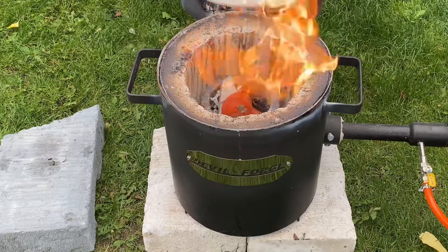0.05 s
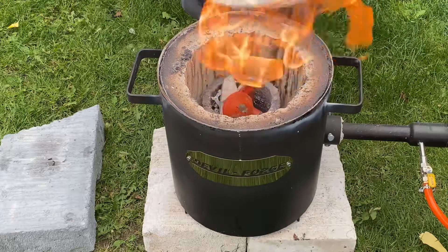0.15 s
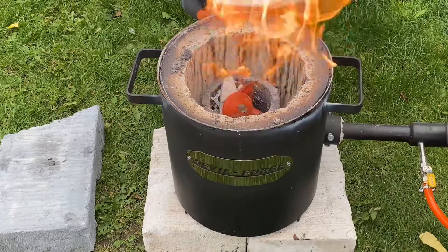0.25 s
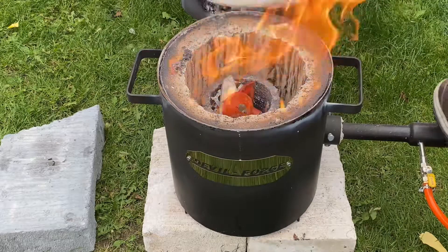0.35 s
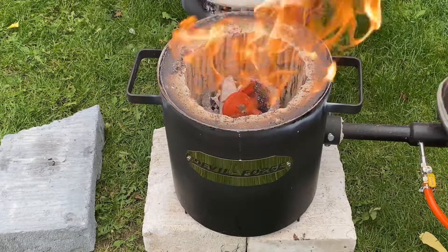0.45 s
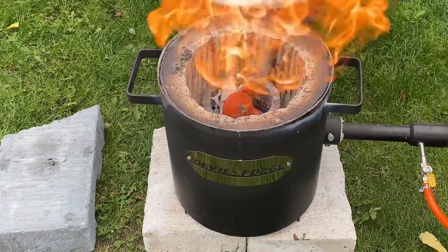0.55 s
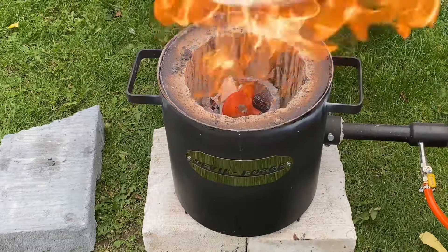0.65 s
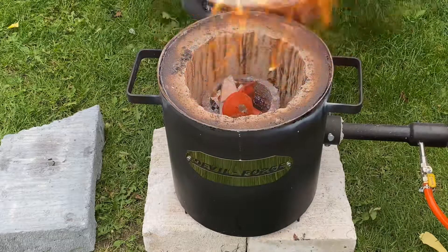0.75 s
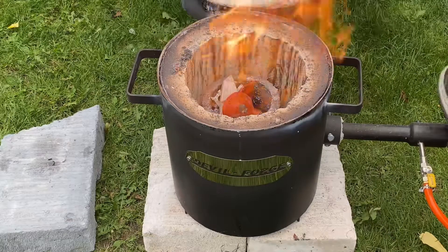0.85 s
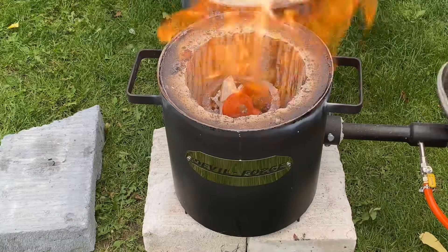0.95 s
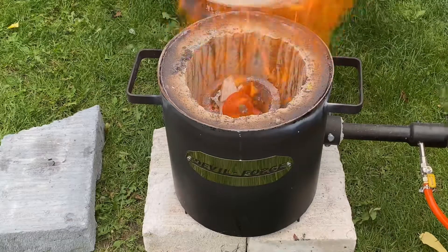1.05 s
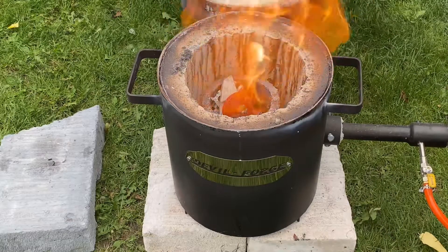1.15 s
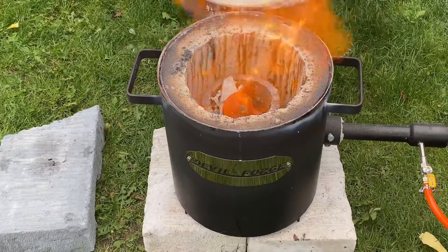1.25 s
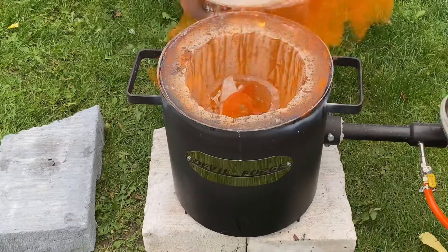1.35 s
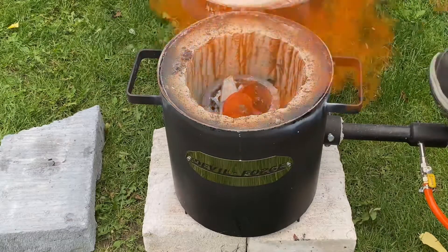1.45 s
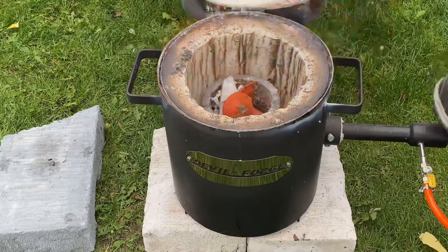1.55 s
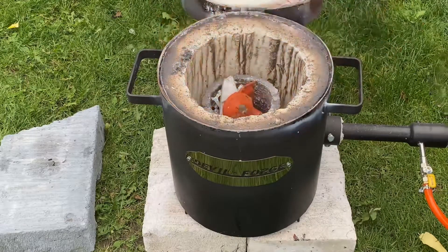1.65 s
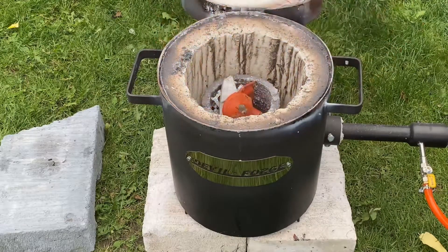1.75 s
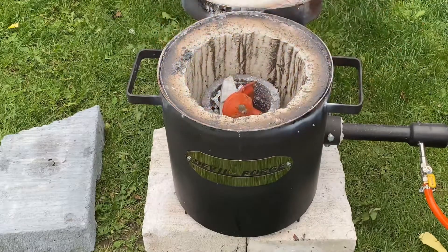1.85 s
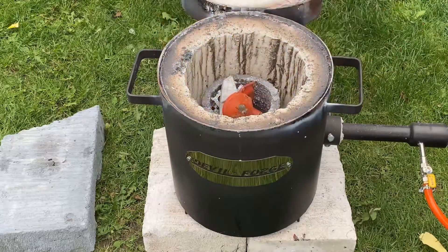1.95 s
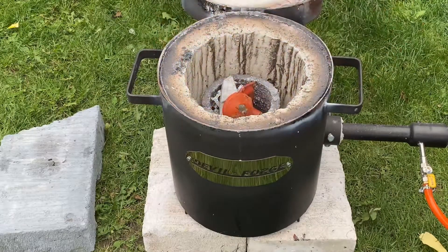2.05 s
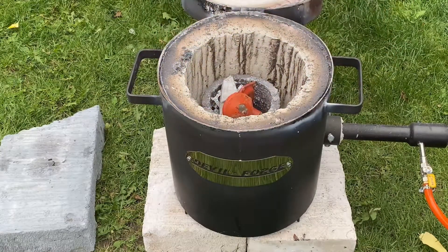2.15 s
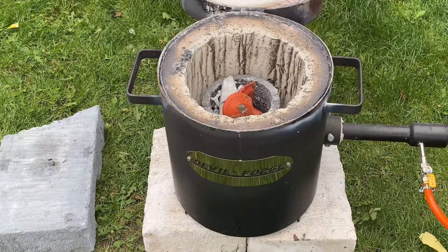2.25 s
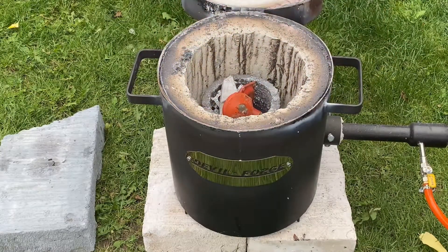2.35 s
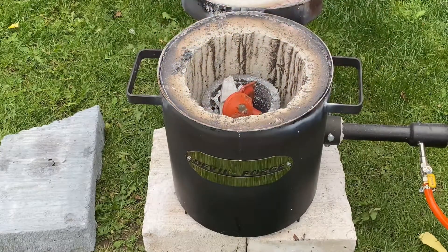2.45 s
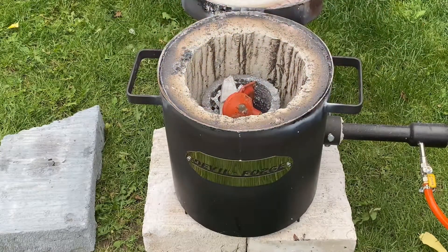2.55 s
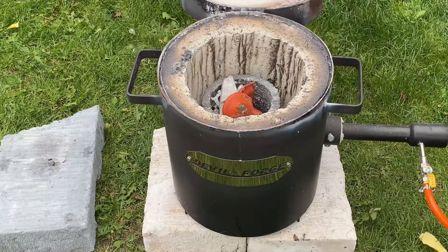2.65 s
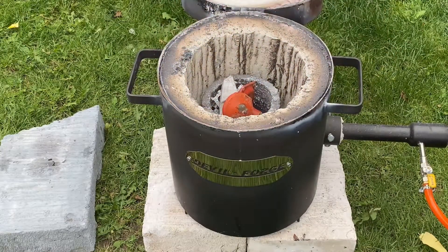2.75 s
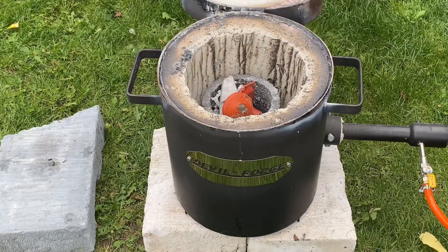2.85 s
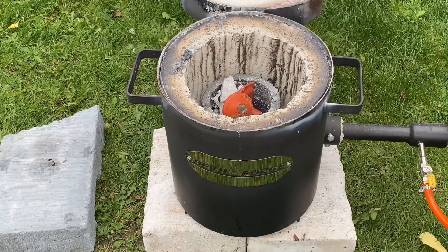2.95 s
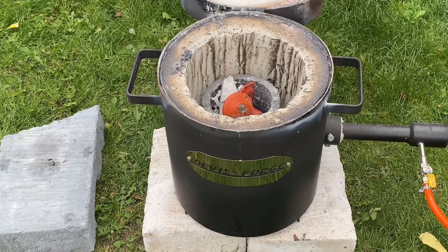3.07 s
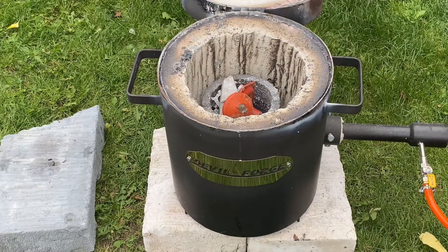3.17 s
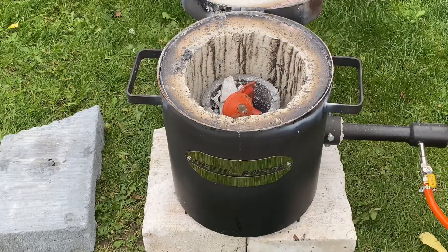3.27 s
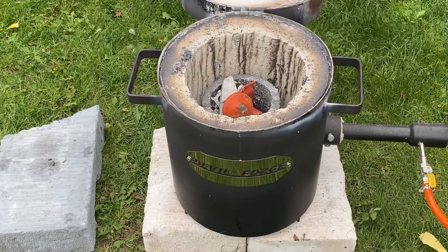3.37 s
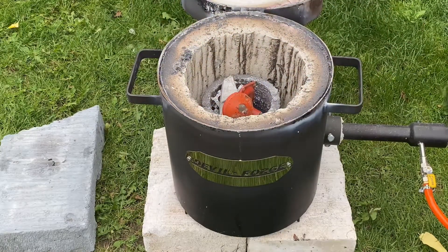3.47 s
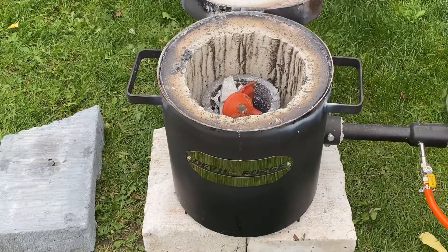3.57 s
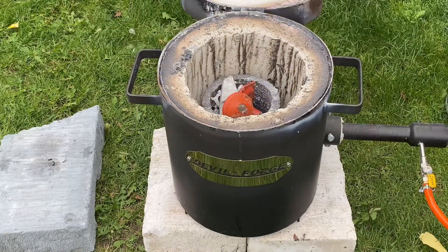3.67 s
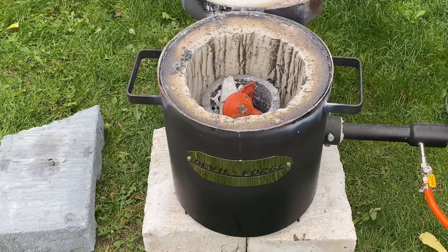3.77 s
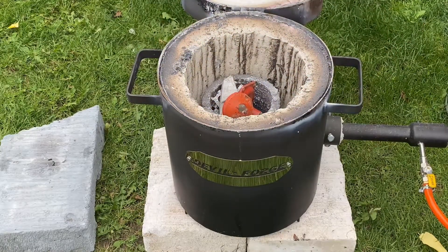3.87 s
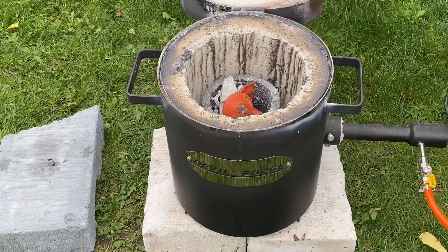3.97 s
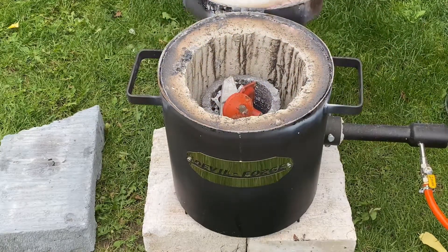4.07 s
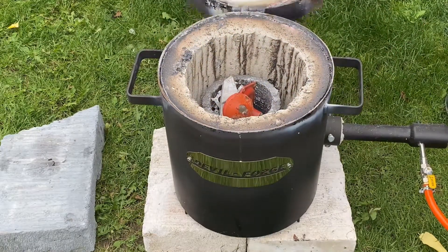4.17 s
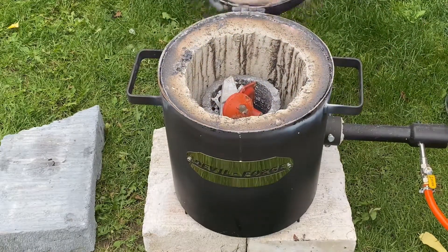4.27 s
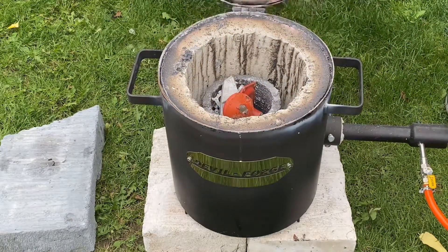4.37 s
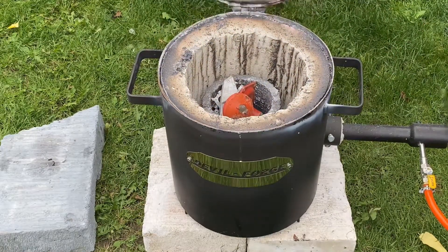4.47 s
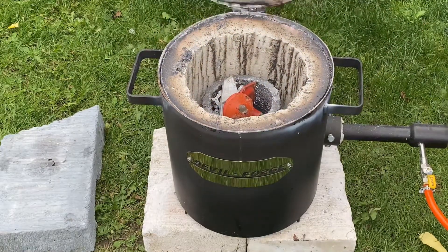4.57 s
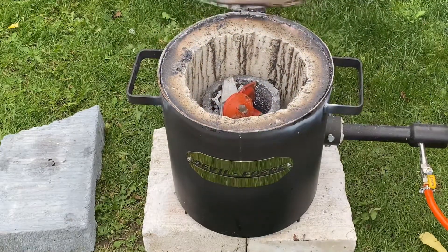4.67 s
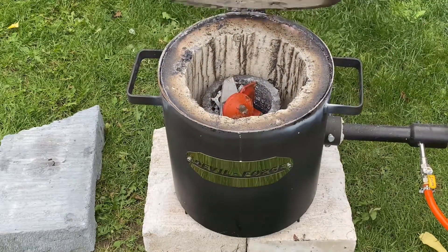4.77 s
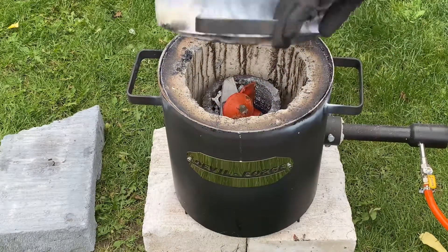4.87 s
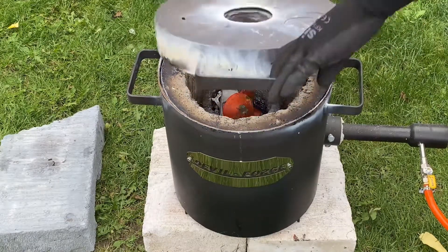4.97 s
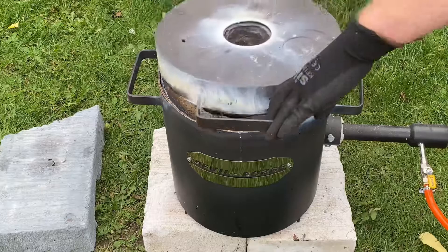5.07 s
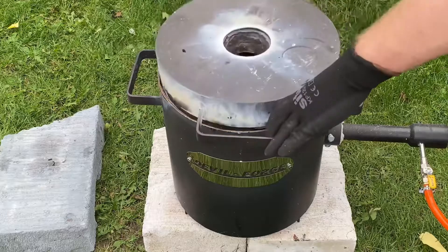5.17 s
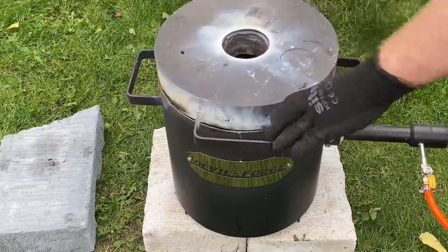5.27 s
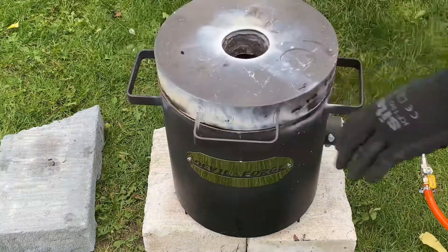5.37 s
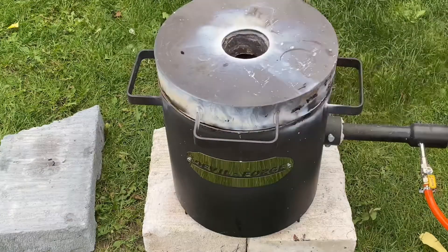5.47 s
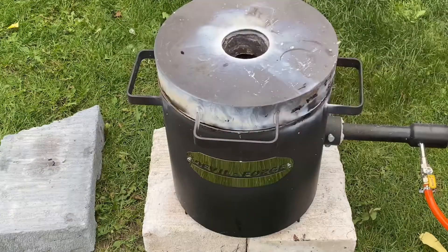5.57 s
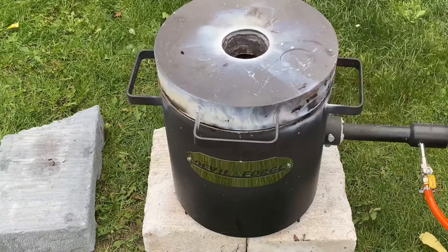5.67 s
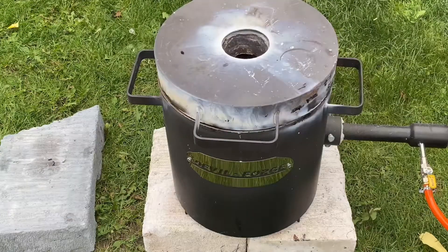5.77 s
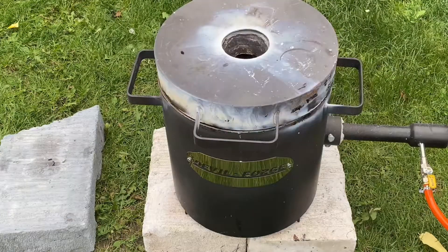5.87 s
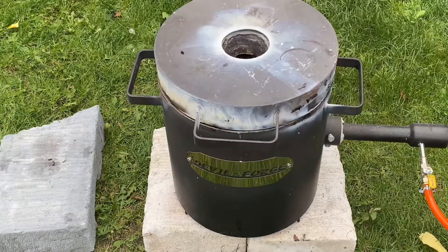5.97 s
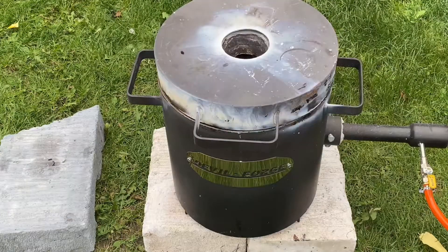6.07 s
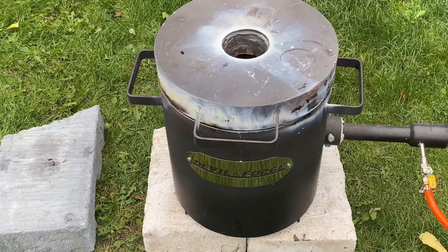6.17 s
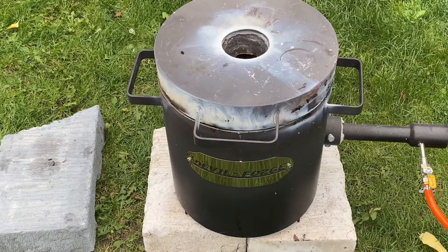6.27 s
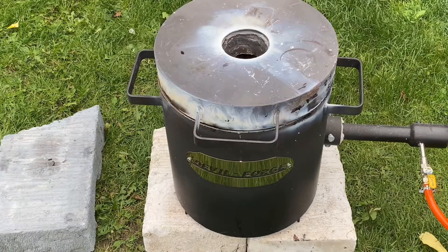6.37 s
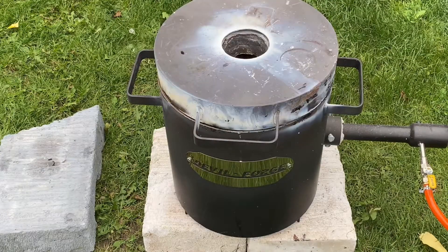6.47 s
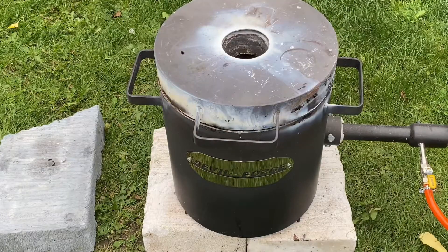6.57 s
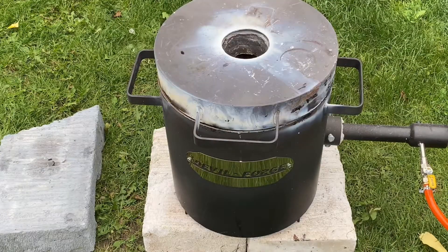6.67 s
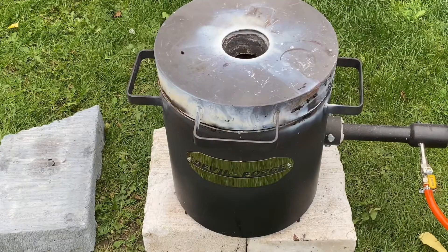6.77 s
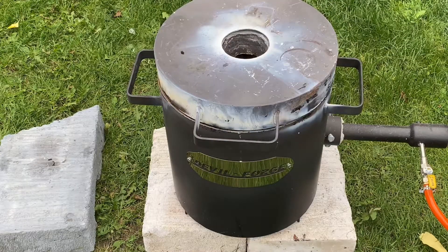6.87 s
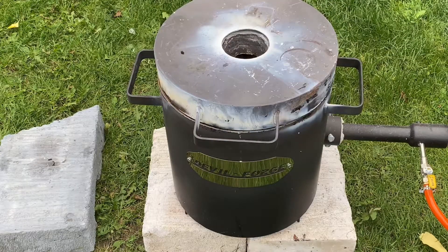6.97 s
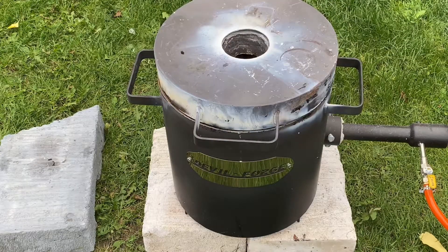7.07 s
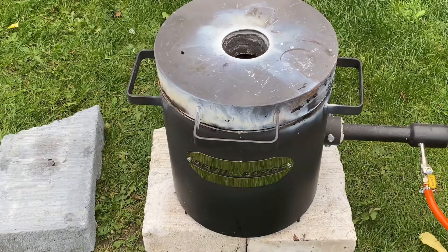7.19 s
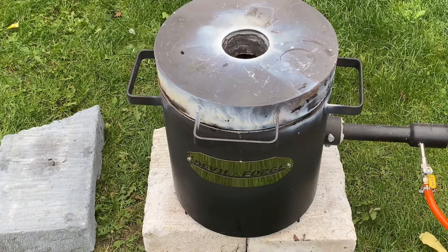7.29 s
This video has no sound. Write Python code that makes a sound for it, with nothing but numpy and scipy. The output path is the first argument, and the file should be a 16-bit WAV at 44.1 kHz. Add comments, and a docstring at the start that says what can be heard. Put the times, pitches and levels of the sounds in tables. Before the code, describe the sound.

Soft whooshes of flame and a few sputtering pops come from a small gas furnace, until it ignites with a thump and starts a continuous, deep, turbulent roar. Later a steel lid is set on with one short metallic clink, rocking and grinding faintly into place, which darkens the roar. A thin gas hiss runs underneath throughout. The sound is close and dry, in open air with no echo.

```python
"""On a lawn, close to a gas-fired melting furnace.
Gas hisses from the jet and the burner tube rasps and pops under a lazy flame. The flame runs back,
the burner catches with a thump, and turbulent burning drives the air in the pot into a roar.
The steel lid is swung over, darkens the roar, lands with a clink and grinds into its seat."""
import sys
import numpy as np
from scipy import signal
from scipy.fft import rfft, irfft
from scipy.io import wavfile
from scipy.ndimage import uniform_filter1d

SR = 44100
rng = np.random.default_rng(int(sys.argv[2]) if len(sys.argv) > 2 else 0)


def file_out(sig):
    """Save sig as 16-bit WAV at sys.argv[1]."""
    # one column per channel
    cols = np.atleast_2d(sig).T
    # limit, then scale
    lim = np.clip(cols, -1, 1)
    pcm = np.round(lim * 32767).astype(np.int16)
    wavfile.write(sys.argv[1], SR, pcm)


N = 323253
T = np.arange(N) / SR
HZ = np.fft.rfftfreq(8192, 1 / SR)
CATCH_S = 1.353  # the burner catches

# tone of the roar, pot open and covered: f/Hz, level/dB
OPEN_EQ = [(20, -34), (35, -32), (60, -6.5), (140, -6), (300, 0.5), (400, -6), (500, -7.5), (600, -19),
           (650, -23.5), (800, -20.5), (1150, -36), (1600, -33), (3000, -45), (8000, -72.5)]
COVERED_EQ = [(20, -43), (35, -29), (65, -2), (110, 1.5), (180, 1), (235, -6.5), (300, -10), (400, -14),
              (550, -25.5), (680, -37), (950, -34), (1230, -46.5), (2000, -46), (6000, -68)]
# air modes of the pot and the dips between them, open and covered: f/Hz, width/Hz, gain/dB
OPEN_POT_MODES = [(102.2, 38.6, 11.5), (142, 17, 0), (189, 37, 4.5), (261, 21.5, 6.5), (640, 25, -7),
                  (1067, 77, 9.5), (1114, 37, -3), (1281, 64, 8.5)]
COVERED_POT_MODES = [(96, 30, 5), (202, 24, 4), (263, 28, 7), (622, 44, 6), (1087, 62, 17), (1200, 90, -4)]
# strongest heaves of the roar: t/s, boost/dB, half length/s
ROAR_HEAVES = [(2.06, 1.5, .06), (4.48, 4.5, 0.015), (4.64, 3.5, 0.033), (6.367, 3, 0.043),
               (7.283, 3, 0.036)]
# ignition swelling through the pot's air modes: f/Hz, level/dB, t/s, half length/s
THUMP_MODES = [(79, -2.5, 1.381, 0.016), (267, 0.5, 1.367, 0.0058), (392, -8, 1.367, 0.0081),
               (734, -18.5, 1.364, 0.0068), (1125, -24.5, 1.363, 0.0049), (1523, -26.5, 1.365, 0.0057)]

# lid swinging over the mouth: t/s, share covered
LID_COVER = [(4.68, 0.015), (5.05, 0.47), (5.2, 0.94), (5.4, 1)]
# lid landing and rocking on the rim: t/s, ring/dB, crunch/dB, crunch t60/s, crack/dB
LID_KNOCKS = [(5.198, -22.5, -23.5, 0.082, -21), (5.205, -41, -31, 0.11, -36), (5.236, -42, -31, 0.15, -52),
              (5.269, -48, -35, 0.082, -52), (5.297, -44, -32.5, 0.17, -46)]
# ring of the steel lid: f/Hz, level/dB, t60/s
LID_MODES = [(890, -13, .3), (1025, -11, .2), (1490, -9, .12), (1628, -9, .12), (1750, -11, .16),
             (1950, -7, .17), (2164, -7, .13), (3148, -17, .26), (3472, -13, .18), (3726, -11, .18),
             (3910, -11, .1), (4069, -14, .13), (4327, -11, .15), (4870, -14, .1), (5167, -14, .13),
             (5486, -13, .11), (5749, -11, .18), (5884, -13, .11), (6040, -13, .1), (6430, -12, .11),
             (6578, -9, .11), (7036, -13, .08), (7790, -21, .15), (11510, -21, .12)]
# grit crushed under the lid: t/s, level/dB, half length/s
GRIT_SCRAPES = [(5.475, -50, .012), (5.525, -45.5, 0.013), (5.64, -52, .015), (5.696, -38, .009),
                (5.72, -49, .02)]
# tone of the lining's crunch, the bright crack of contact and the grit: f/Hz, level/dB
CRUNCH_EQ = [(200, -34), (900, 10.5), (1200, 1), (2000, 5.5), (2700, -7), (3700, -2), (4700, -9),
             (6500, -10), (8500, -13), (12000, -19), (16000, -32)]
CRACK_EQ = [(500, -10), (2300, 3), (4700, -2), (6700, 2), (8500, -8), (11500, -14), (16000, -17)]
GRIT_EQ = [(1000, -34), (4000, -14), (6000, 0), (9000, -3), (12000, 0), (15000, -5), (17000, -8)]

# lazy flame flaring in the pot: t/s, rumble/dB, rush/dB, rush t60/s
FLAME_FLARES = [(0.0, -51, -21.5, 0.11), (0.04, -58, -43.5, 0.38), (0.53, -39, -40, 0.9),
                (0.82, -42, -65, .3), (1.045, -36, -38, 0.26), (1.085, -50, -35, .2)]
# tone of its rumble and its rush: f/Hz, level/dB
RUMBLE_EQ = [(15, -26), (42, -4.5), (72, -3), (110, -5), (170, -14.5), (500, -51), (2000, -78)]
RUSH_EQ = [(40, -41), (130, -4.5), (190, -5), (270, 2), (380, -7), (480, -13.5), (900, -32), (3000, -50)]

# gusts rasping through the burner tube: t/s, relative level/dB, half length/s
TUBE_GUSTS = [(0.004, -41.5, .014), (0.055, -47, 0.084), (0.601, -37.5, 0.045), (0.704, -41.5, 0.046),
              (1.126, -51, 0.14)]
# tone of the rasp: f/Hz, level/dB
TUBE_EQ = [(200, -16), (700, -5.5), (1500, -4), (2600, -4), (3800, -13), (5700, -10.5), (7000, -17),
           (8000, -19), (12000, -24), (16000, -34)]
# resonances of the tube: f/Hz, width/Hz, gain/dB
TUBE_PEAKS = [(1040, 90, 10), (1650, 80, 10), (1990, 90, 13), (2390, 150, 7), (2950, 120, 7),
              (3510, 110, 5), (5650, 140, 9), (6080, 70, 7), (6750, 300, 4)]
# flame pops in the tube: t/s, level/dB, t60/s, centre f/Hz
TUBE_POPS = [(.175, -54, .03, 1800), (.477, -44.5, 0.044, 6000), (0.503, -35.5, 0.07, 2000),
             (.534, -46.5, 0.033, 3000), (1.027, -29.5, 0.037, 2130), (1.129, -57, .03, 2500),
             (1.183, -46, 0.027, 2600), (1.223, -46, 0.027, 3000)]

# hiss of the gas jet and of air drawn into the burner: f/Hz, level/dB
JET_EQ = [(20, -98), (200, -89.5), (1000, -88.5), (2000, -95), (3000, -93.5), (4500, -101), (5600, -93),
          (7200, -100), (8500, -92), (9600, -94.5), (11300, -90.5), (12600, -99.5), (14700, -91.5),
          (16000, -100)]
INTAKE_EQ = [(300, -100), (1500, -88.5), (2500, -89), (3000, -84), (3600, -97.5), (4300, -90.5),
             (4800, -97), (6400, -94), (7200, -102), (12000, -115)]
# whistles and dips of the jet, cold and hot, and of the intake: f/Hz, width/Hz, gain/dB
COLD_JET_PEAKS = [(1050, 120, 6), (3380, 160, 8), (4250, 400, -4), (4570, 80, 5), (5000, 120, 4),
                  (5630, 170, 7), (9200, 1000, -4), (10500, 200, 9), (11150, 250, 5), (14650, 250, 7)]
HOT_JET_PEAKS = [(5560, 200, 4.4), (6350, 300, 4), (7540, 240, 7.6), (9600, 670, 2.8), (10960, 110, 11.5),
                 (11760, 250, 3.5)]
INTAKE_PEAKS = [(2227, 115, 15), (2600, 130, -9), (2752, 56, 11), (2880, 76, -5), (3200, 200, 12.5),
                (3720, 230, -3.5), (4140, 170, 10), (4524, 71, 11), (4770, 140, 0), (5040, 110, 11.5),
                (5630, 160, 8.5), (5840, 240, -12), (6330, 300, 5.5)]

# stereo phase: f/Hz, lead of left/rad
STEREO_PHASE = [(20, 0), (120, -.24), (300, -.24), (450, -.1), (750, 0), (2600, 0), (3200, .55), (4500, .1),
                (5000, 0), (7750, -.1), (8150, 2.3), (9000, 2.1), (10400, 0), (11650, 0), (12150, -1),
                (12600, -3), (13800, -3.25), (15250, -6.2)]
# stereo balance: f/Hz, left over right/dB
STEREO_BALANCE = [(60, 0.5), (120, 0.0), (240, -1.0), (480, -3.0), (950, -4.0), (1890, 0.0), (3770, 0.5),
                  (7520, 0.0), (15000, 0.0)]
# likeness of left and right turbulence: f/Hz, correlation
STEREO_LIKENESS = [(300, .998), (700, .94), (1200, .95), (1700, .998), (2600, .99), (3600, .9),
                   (5000, .995), (7400, .99), (8100, .75), (9900, .75), (10500, .99), (11600, .99),
                   (12200, .5), (12700, .98), (13700, .98), (14300, .72), (15400, .98)]


def roar(body_db=-14, crackle_db=-35, split_hz=660, warm_up_s=0.33):
    """Turbulent burning drives the air modes of the pot; the lid lowers them and shuts in the crackle."""
    cover = np.interp(T, *np.transpose(LID_COVER))
    open_pot = colour(noise(), eq(OPEN_EQ) + peaks(OPEN_POT_MODES))
    covered_pot = colour(noise(), eq(COVERED_EQ) + peaks(COVERED_POT_MODES))
    pot = np.sqrt(1 - cover) * open_pot + np.sqrt(cover) * covered_pot
    lows = signal.sosfiltfilt(signal.butter(6, split_hz, fs=SR, output="sos"), pot)
    flicker = flutter(slow_hz=6.1, fast_hz=88)  # flame fronts fold and collapse
    surge_db = flutter(slow_hz=2.6, fast_hz=17)  # a stronger flame also crackles more
    cold = np.exp(-np.maximum(T - CATCH_S, 0) / warm_up_s)  # crackle builds as the pot heats
    heave_db = sum(db * swell(s, half) for s, db, half in ROAR_HEAVES)
    body = steadied(lows * amp(0.71 * flicker), span_s=0.06, share=0.78)
    body *= amp(body_db - 0.44 * cover + surge_db + heave_db)
    crackle = steadied((pot - lows) * amp(1.67 * flicker), span_s=0.28, share=1)
    crackle *= amp(crackle_db - 8.5 * cover - 4.5 * cold + 0.76 * surge_db + 0.24 * heave_db)
    return fade_in(mid_s=1.378, rise_s=0.022) * (body + crackle)


def ignition(puff_db=-30):
    """The mixture in the pot lights all at once: a thump with a short puff on top."""
    thump = sum(amp(db) * swell(s, half) * np.cos(2 * np.pi * hz * (T - s))
                for hz, db, s, half in THUMP_MODES)
    puff_eq = eq([(100, -14), (1200, 4), (2000, -11), (4000, -12), (9000, -35), (16000, -45)])
    puff = unit_rms(colour(noise(), puff_eq))
    return thump + amp(puff_db) * swell(crest_s=1.363, half_s=0.013) * puff


def lid(crack_t60=0.036):
    """Each knock cracks, rings the steel shell and crunches the lining; then grit grinds in the seat."""
    t = np.arange(SR // 2) / SR
    blows, crunch, crack = np.zeros((3, N))
    for s, ring_db, crunch_db, t60, crack_db in LID_KNOCKS:
        blows[round(s * SR)] += amp(ring_db)
        crunch += amp(crunch_db) * burst(s, t60)
        crack += amp(crack_db) * burst(s, crack_t60)
    ring = 0
    for hz, db, t60 in LID_MODES:
        phase = rng.random() + 0.053 * rng.standard_normal((2, 1))  # slightly apart left and right
        ring += amp(db - 60 * t / t60) * np.sin(2 * np.pi * (hz * t + phase))
    grit = sum(amp(db) * swell(s, half) for s, db, half in GRIT_SCRAPES)
    grains = noise() * amp(1.9 * flutter(slow_hz=98, fast_hz=700))  # lining breaks in tiny uneven steps
    breaking = sum(envelope * unit_rms(colour(grains, eq(tone)))
                   for envelope, tone in [(crunch, CRUNCH_EQ), (crack, CRACK_EQ), (grit, GRIT_EQ)])
    return signal.oaconvolve(blows[None], ring, axes=1)[:, :N] + breaking


def lazy_flame(idle_db=-58, fill_db_per_s=8.5, run_back_db_per_s=213):
    """Unmixed gas rumbles as the pot fills, flares up, and at last the flame runs back to the burner."""
    idle = amp(idle_db + fill_db_per_s * T) * (T < CATCH_S)
    approach = amp(-run_back_db_per_s * abs(T - CATCH_S))
    run_back = np.where(T < CATCH_S, approach, burst(CATCH_S, t60=0.12))
    rumbles, rushes = [idle, amp(-16.5) * run_back], [amp(-25.5) * run_back]
    for s, rumble_db, rush_db, t60 in FLAME_FLARES:
        rumbles.append(amp(rumble_db) * flare(s, t60=0.34))
        rushes.append(amp(rush_db) * flare(s, t60))
    rumble = steadied(colour(noise(), eq(RUMBLE_EQ)), span_s=0.038, share=0.97)
    rush = steadied(colour(noise(), eq(RUSH_EQ)), span_s=0.0255, share=1)
    return np.linalg.norm(rumbles, axis=0) * rumble + np.linalg.norm(rushes, axis=0) * rush


def sputter(rasp_db=2.5, rough_db=2.5, whistle_db=-50, whistle_hz=4803):
    """The unsettled flame rasps and pops in the burner tube, which whistles when blown hard."""
    flow = np.sqrt(sum((amp(db) * swell(s, half)) ** 2 for s, db, half in TUBE_GUSTS))
    drive = flow * amp(rasp_db + rough_db * flutter(slow_hz=29.9, fast_hz=150))
    white, modes_db = unit_rms(noise()), peaks(TUBE_PEAKS)
    rasp_eq = eq(TUBE_EQ) + modes_db
    rasp = colour(drive * white, rasp_eq) / rms(amp(rasp_eq))
    detune_hz = np.minimum(abs(HZ - whistle_hz), 1000)
    whistle_eq = -20 * np.log10(1 + (detune_hz / 12) ** 2)
    whistle = steadied(colour(white, whistle_eq), span_s=0.039, share=0.95)
    whistle *= amp(whistle_db) * swell(crest_s=0.63, half_s=0.072)  # spans the two strong gusts
    pops = 0
    for s, db, t60, hz in TUBE_POPS:
        pop_eq = 0.65 * modes_db - np.minimum(11 * np.log2((HZ + 1) / hz) ** 2, 30)
        pops += amp(db) * colour(burst(s, t60) * white, pop_eq) / rms(amp(pop_eq))
    return rasp + whistle + pops


def jet():
    """Gas leaves the nozzle in a wavering hiss; once the burner draws, whistles shift and air rushes in."""
    hot = fade_in(mid_s=1.43, rise_s=0.22)
    cold_hiss = colour(noise(), eq(JET_EQ) + peaks(COLD_JET_PEAKS))
    hot_hiss = colour(noise(), eq(JET_EQ) + peaks(HOT_JET_PEAKS))
    hiss = np.sqrt(1 - hot) * cold_hiss + np.sqrt(hot) * hot_hiss
    intake = fade_in(mid_s=1.37, rise_s=0.029) * colour(noise(), eq(INTAKE_EQ) + peaks(INTAKE_PEAKS))
    hiss *= amp(1.43 * flutter(slow_hz=0.45, fast_hz=10))
    intake *= amp(1.5 * flutter(slow_hz=0.93, fast_hz=40))
    return hiss + intake


def noise():
    """White turbulence of 0 dB per Hz, almost alike left and right."""
    common, apart = rfft(rng.standard_normal((2, N)))
    likeness = eq(STEREO_LIKENESS, np.fft.rfftfreq(N, 1 / SR))
    mid, side = common * np.sqrt((1 + likeness) / 2), apart * np.sqrt((1 - likeness) / 2)
    return irfft(np.array([mid + side, mid - side]), N) * np.sqrt(SR / 2)


def flutter(slow_hz, fast_hz):
    """Random wavering of rms 1 between two rates."""
    hz = np.fft.rfftfreq(N, 1 / SR)
    band = hz / (hz + slow_hz) / (1 + (hz / fast_hz) ** 2)
    return unit_rms(irfft(rfft(rng.standard_normal(N)) * band, N))


def steadied(x, span_s, share):
    """Levels out a share of the turbulence's swings in power, as a steady fuel supply does."""
    power = abs(uniform_filter1d((unit_rms(x) ** 2).mean(0), int(span_s * SR))) + 1e-6
    return unit_rms(x / power ** (share / 2))


def eq(points, hz=HZ):
    """Curve through points on a log-frequency axis."""
    f, value = np.transpose(points)
    return np.interp(np.log(hz + 1), np.log(f + 1), value)


def peaks(modes):
    """Bell boosts and cuts in dB."""
    return sum(db / (1 + (2 * (HZ - hz) / width) ** 2) for hz, width, db in modes)


def colour(x, db):
    """Minimum-phase EQ with the given curve in dB."""
    log_gain = np.log(amp(np.r_[db, db[-2:0:-1]]))
    taps = np.fft.ifft(np.exp(np.conj(signal.hilbert(log_gain)))).real[:len(HZ)]
    return signal.oaconvolve(x, taps[None], axes=1)[:, :N]


def burst(s, t60):
    """Envelope with a hard attack and a dying tail."""
    return (T >= s) * amp(-60 * np.maximum(T - s, 0) / t60)


def swell(crest_s, half_s):
    """Bell-shaped envelope."""
    return np.exp(-((T - crest_s) / half_s) ** 2)


def flare(crest_s, t60):
    """Envelope with a quick, soft attack and a dying tail."""
    return np.where(T < crest_s, swell(crest_s, half_s=0.016), burst(crest_s, t60))


def fade_in(mid_s, rise_s):
    """S-curve from 0 to 1."""
    return (1 + np.tanh((T - mid_s) / rise_s)) / 2


def amp(db):
    """Decibels to gain."""
    return 10 ** (np.asarray(db) / 20)


def rms(x):
    """Root-mean-square level."""
    return np.sqrt(np.mean(x ** 2) + 1e-20)


def unit_rms(x):
    """Scales to rms 1."""
    return x / rms(x)


def scene():
    """All sources in the open air, with no echo from the lawn."""
    return jet() + sputter() + lazy_flame() + ignition() + roar() + lid()


def record(dry, low_cut_hz=36, high_cut_hz=15800, ceiling=0.95):
    """Offsets left and right in phase and level, cuts deep bass, rounds off peaks and trims the top."""
    hz = np.fft.rfftfreq(N, 1 / SR)
    left = amp(eq(STEREO_BALANCE, hz) / 2) * np.exp(0.5j * eq(STEREO_PHASE, hz))
    low_cut = 1 / np.sqrt(1 + (low_cut_hz / (hz + 1)) ** 6)
    stereo = irfft(rfft(dry) * low_cut * np.array([left, 1 / left]), N)
    rounded = stereo / (1 + (stereo / ceiling) ** 8) ** (1 / 8)
    high_cut = signal.firwin(511, high_cut_hz, window=("kaiser", 9), fs=SR)
    return signal.oaconvolve(rounded, high_cut[None], "same")


dry = scene()
out = record(dry)
file_out(out)
```